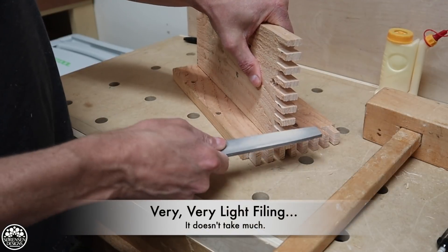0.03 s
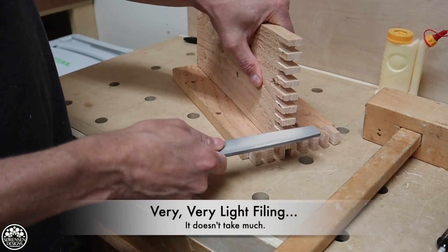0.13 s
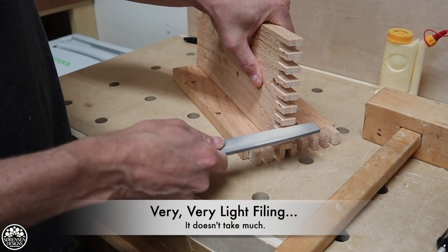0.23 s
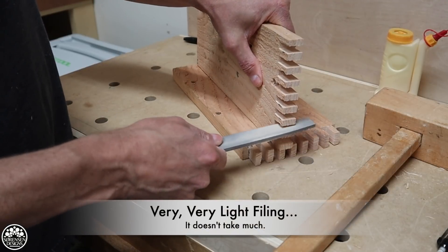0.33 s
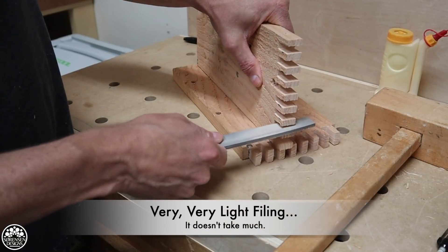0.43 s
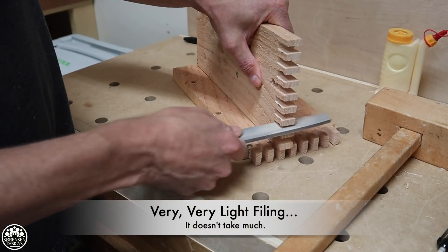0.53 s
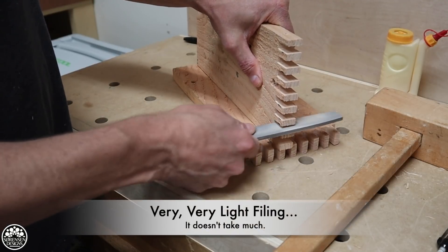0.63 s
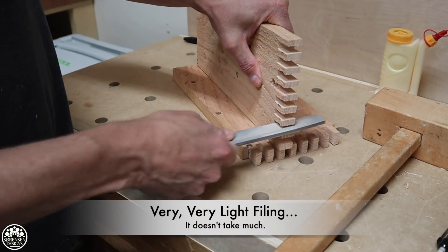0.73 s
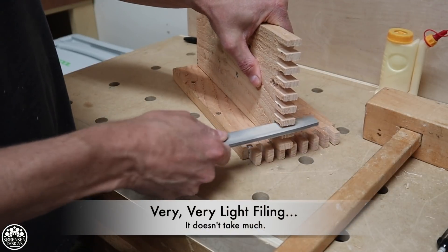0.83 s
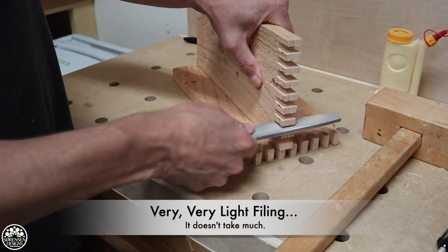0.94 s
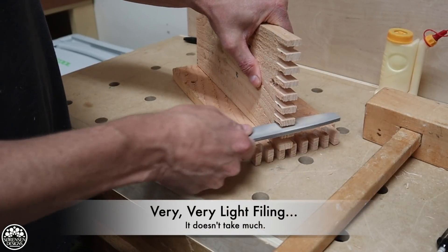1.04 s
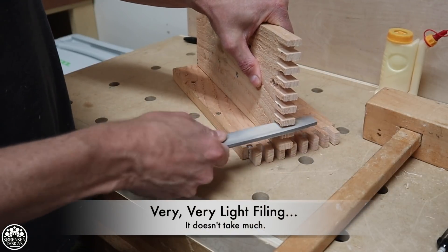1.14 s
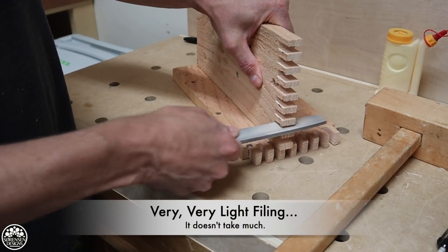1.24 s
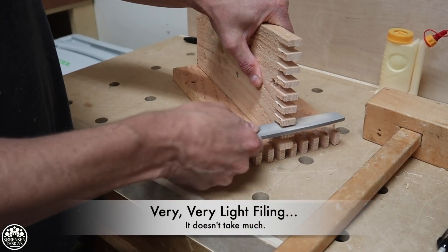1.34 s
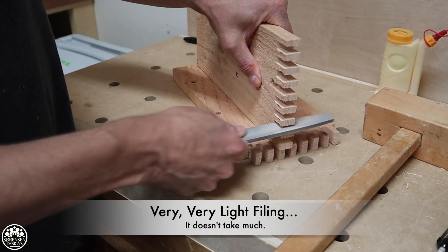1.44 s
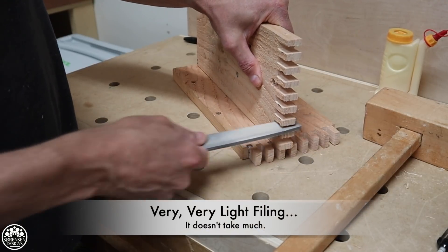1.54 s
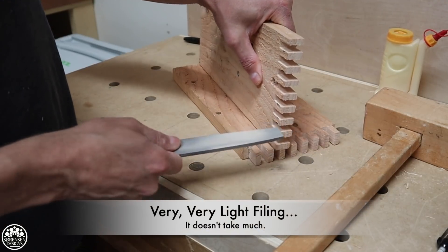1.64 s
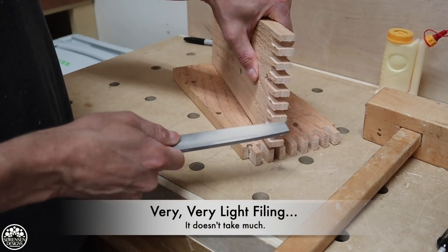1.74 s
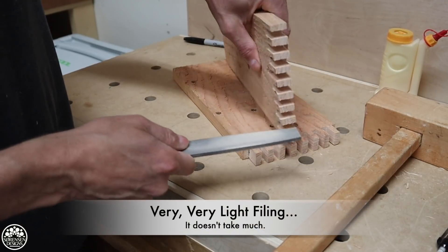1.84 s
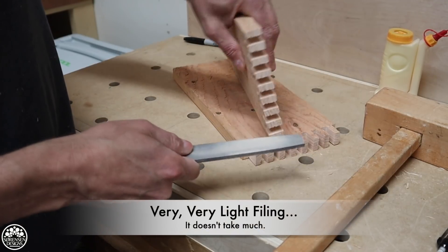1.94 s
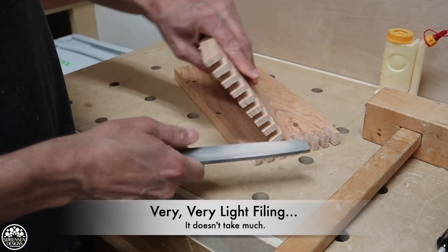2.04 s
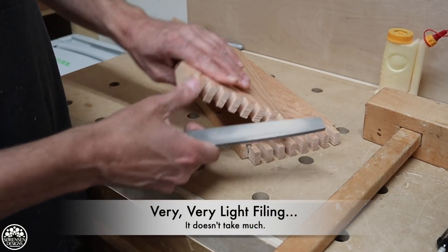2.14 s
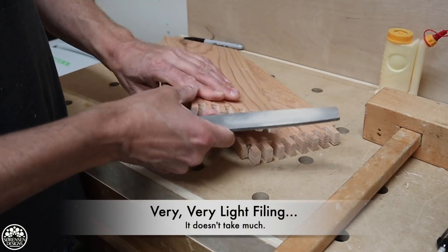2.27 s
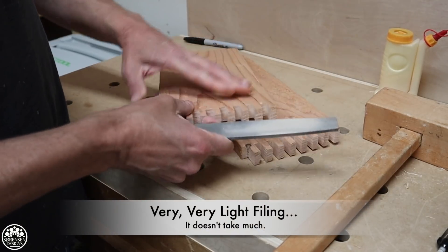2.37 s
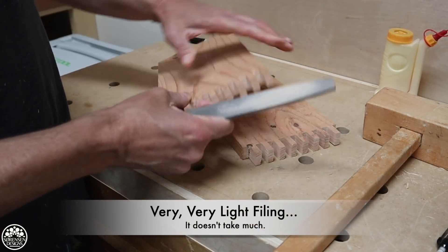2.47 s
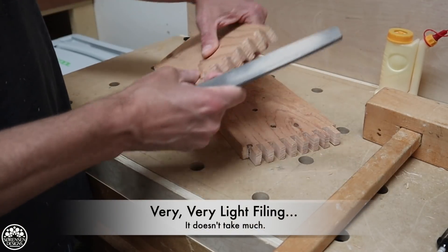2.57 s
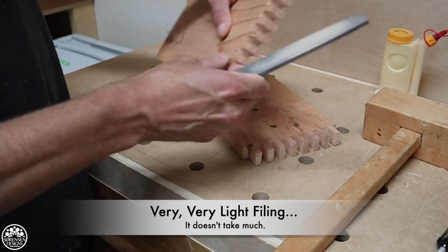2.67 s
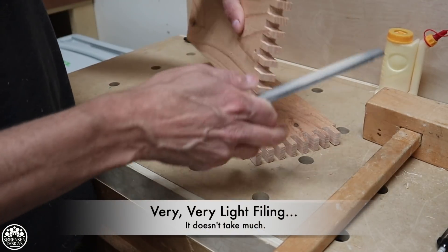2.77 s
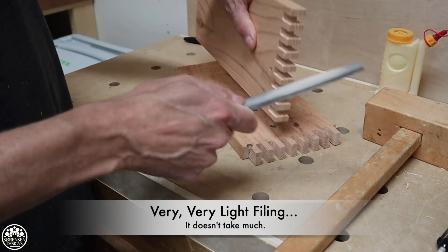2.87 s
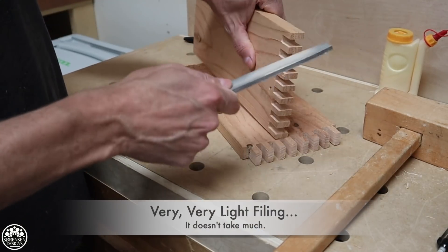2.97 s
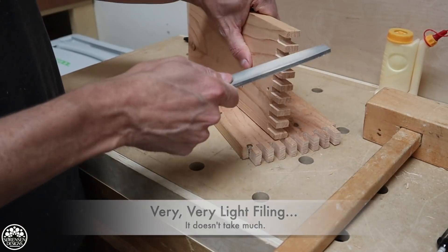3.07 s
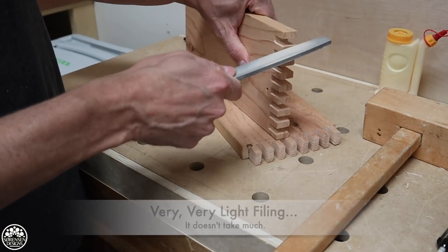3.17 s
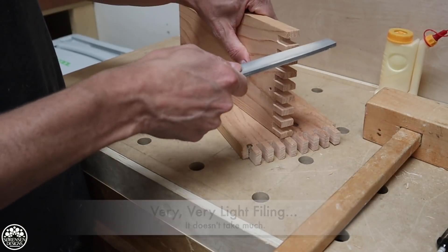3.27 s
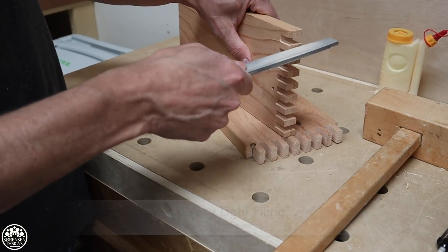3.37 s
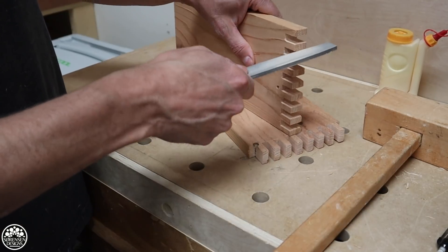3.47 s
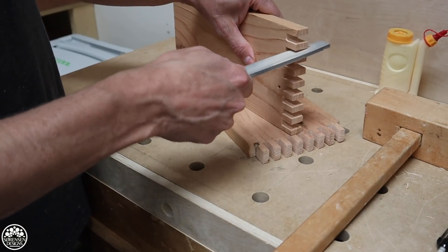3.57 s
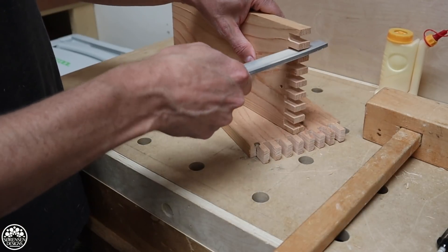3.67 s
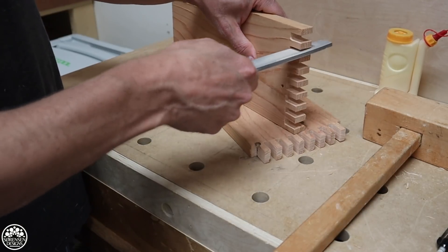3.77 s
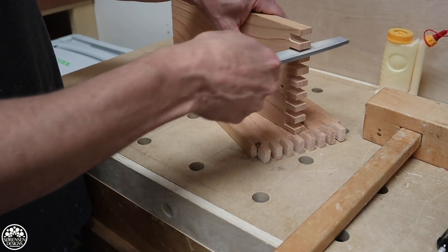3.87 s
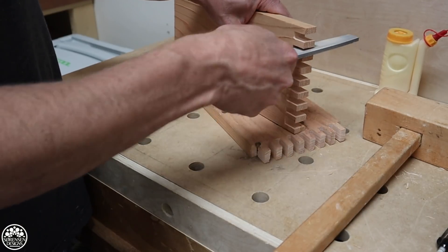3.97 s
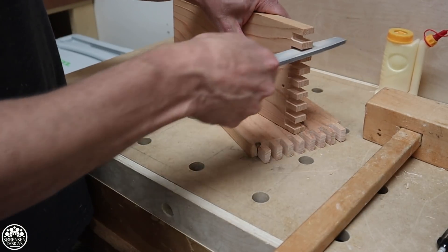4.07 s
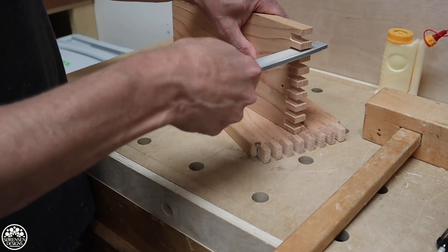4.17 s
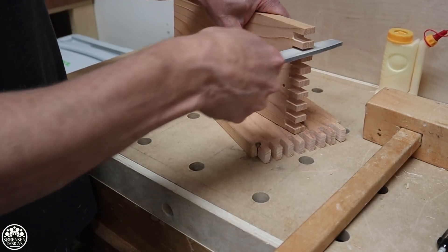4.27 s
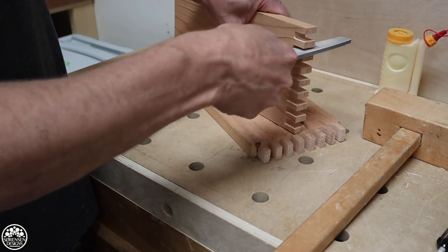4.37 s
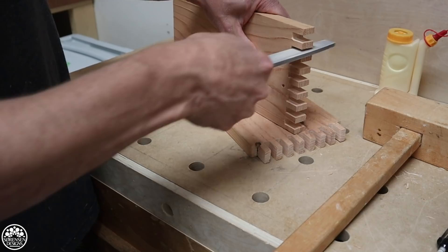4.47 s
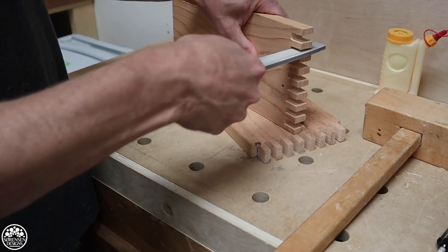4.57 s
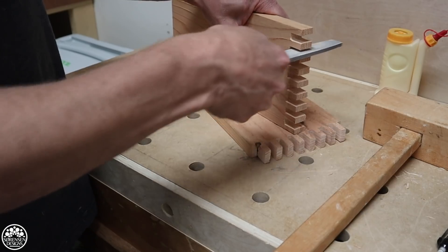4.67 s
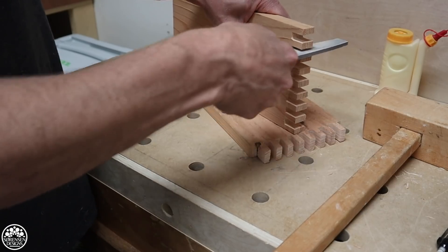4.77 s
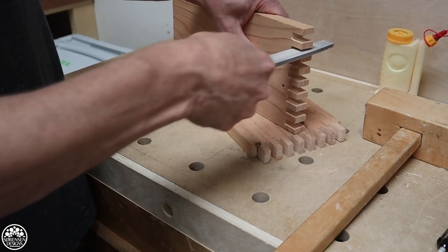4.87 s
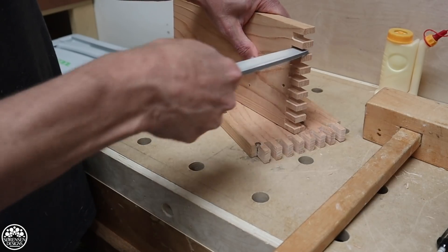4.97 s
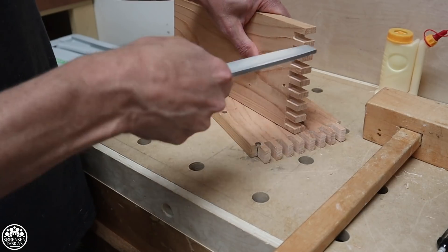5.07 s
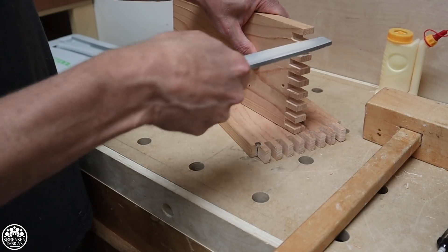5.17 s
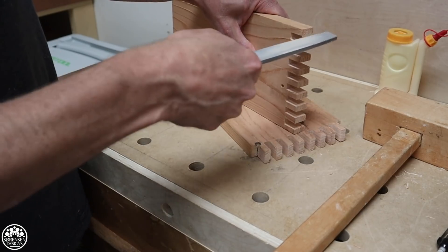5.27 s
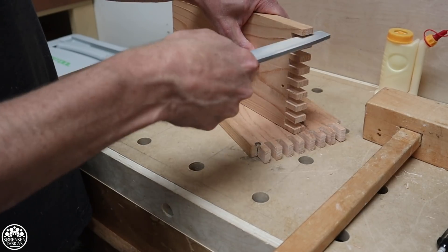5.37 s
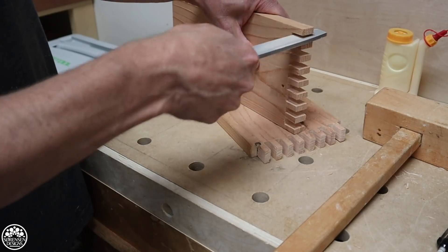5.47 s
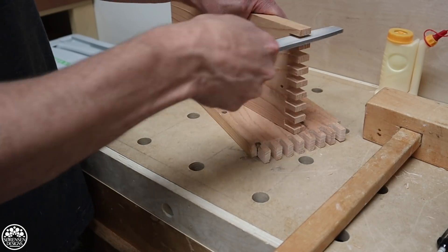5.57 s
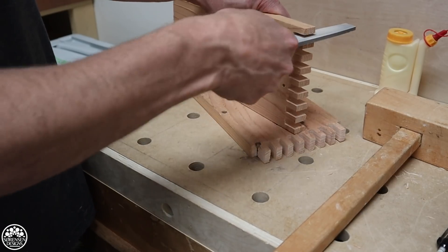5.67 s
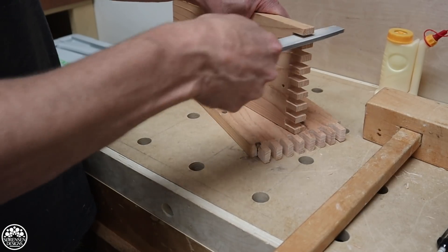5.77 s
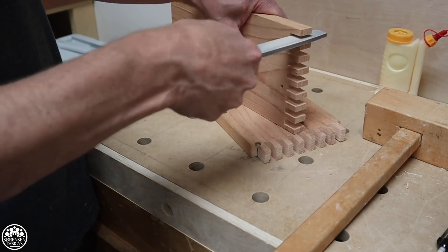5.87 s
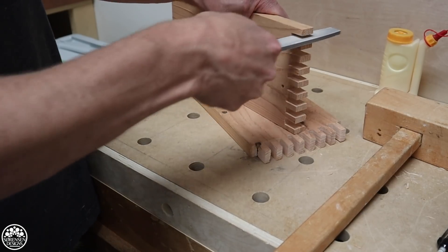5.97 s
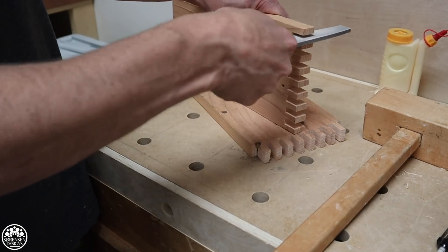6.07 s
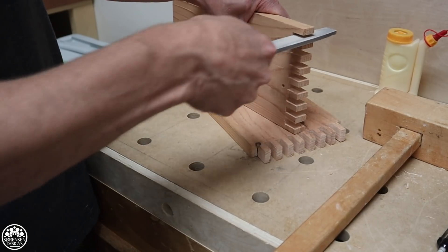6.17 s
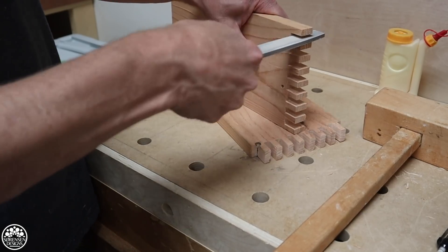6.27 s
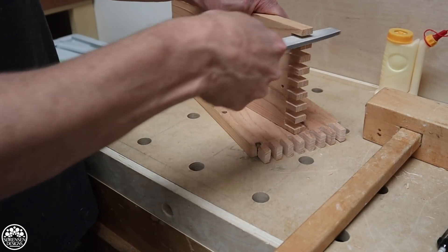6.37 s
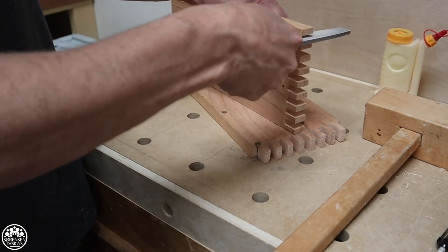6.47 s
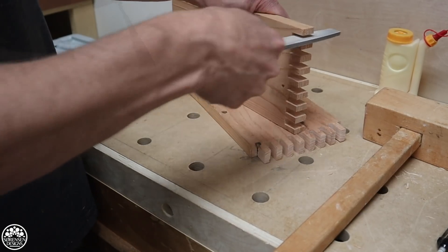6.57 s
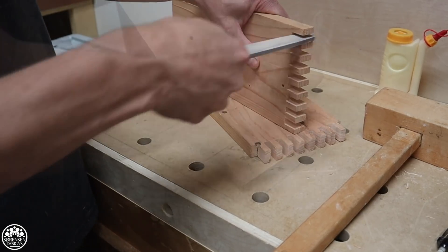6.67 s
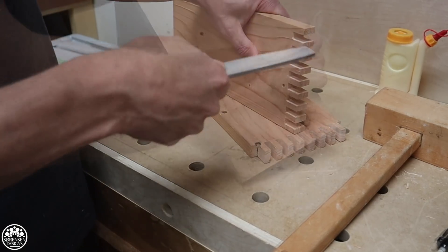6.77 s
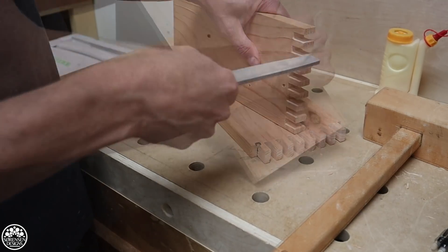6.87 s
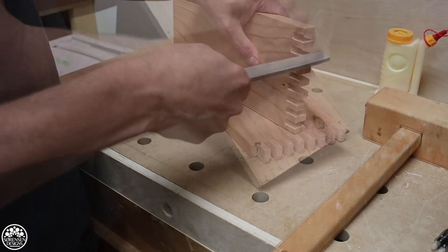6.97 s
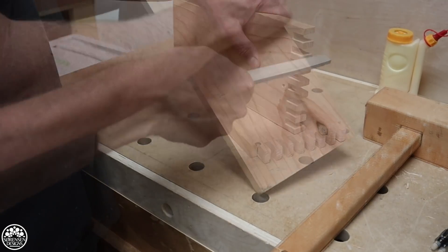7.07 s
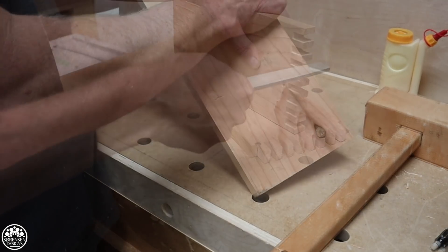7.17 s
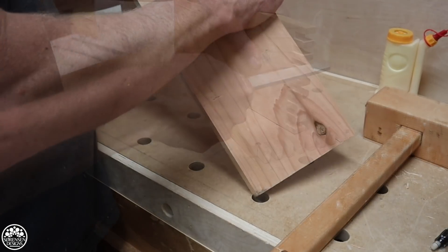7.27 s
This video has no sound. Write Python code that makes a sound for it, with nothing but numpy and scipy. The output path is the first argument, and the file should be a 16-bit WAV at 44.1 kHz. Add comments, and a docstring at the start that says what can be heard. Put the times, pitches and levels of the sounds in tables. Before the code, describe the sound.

A few soft knocks and scuffs of wood on a workbench open the sound. From about 0.5 to 1.7 seconds a flat metal file rasps over a board's joint fingers in six quick, light back-and-forth strokes. Between 1.7 and 3.7 seconds the board is handled: it slides and scuffs, clacks down with a short chatter near 2.5 seconds, then thuds at about 2.7 and 3.1 seconds as it is stood up again. The blade taps the wood with a brief ring at 3.7 seconds. A second run of six slightly softer strokes lasts from 3.9 to 5.1 seconds. After small bumps around 5.4 seconds, a third run goes from 5.6 to 6.8 seconds, with another clear tap near 6.5. Soft knocks and a slide follow around 7 seconds. The sound is mono, with short small-workshop reflections and a faint mains hum.

```python
"""Three runs of light rasping strokes: a flat metal file works back and forth over a board's joint fingers.
Its teeth pluck wood fibres and ring board and blade, differently at each finger. Between runs come
scuffs, knocks and a short chatter as the board is slid, laid down and stood up again on the bench.
The blade now and then taps or grazes the wood. Small workshop, faint mains hum, mono."""
import sys
import numpy as np
from scipy import signal
from scipy.fft import rfft, irfft
from scipy.io import wavfile
from scipy.ndimage import uniform_filter1d

SR = 44100
rng = np.random.default_rng(int(sys.argv[2]) if len(sys.argv) > 2 else 0)


def store_wav(level_fs):
    """Save 16-bit WAV to argv[1]."""
    pcm = np.round(np.clip(np.atleast_2d(level_fs), -1, 1) * 32767)
    wavfile.write(sys.argv[1], SR, pcm.T.astype(np.int16))


N = 322371
TIME = np.arange(N) / SR
USUAL_DB = -29.5  # ordinary stroke or blow


def undb(db):
    """dB to gain."""
    return 10 ** (np.asarray(db) / 20)


def unit(x, head=None):
    """Scale to rms 1, overall or over the first `head` samples."""
    return x / np.sqrt(np.mean(x[:head] ** 2) + 1e-20)


def band(x, lo_hz, hi_hz):
    """Band-pass."""
    sos = signal.butter(3, [lo_hz, min(hi_hz, .45 * SR)], "band", fs=SR, output="sos")
    return signal.sosfilt(sos, x)


def colour(x, slope, modes=(), size=8192):
    """Minimum-phase filter: slope (f/Hz, level/dB) plus resonances (f/Hz, width/Hz, lift/dB)."""
    f = np.maximum(np.fft.rfftfreq(size, 1 / SR), 1)
    slope_hz, slope_db = np.transpose(slope)
    broad = undb(np.interp(np.log(f), np.log(slope_hz), slope_db))
    lift = 1 + sum((undb(db) ** 2 - 1) / (1 + (2 * (f - hz) / width) ** 2) ** 1.63
                   for hz, width, db in modes)
    cepstrum = irfft(np.log(broad) + np.log(np.maximum(lift, .1)) / 2)[:size // 2]
    cepstrum[1:] *= 2
    return signal.fftconvolve(x, irfft(np.exp(rfft(cepstrum, size))))[:len(x)]


def walk(rate_hz):
    """Smooth random drift, rms 1."""
    knots = np.arange(0, N, SR / rate_hz)
    return unit(np.interp(np.arange(N), knots, rng.standard_normal(len(knots))))


def snaps(rate_hz, spread_db):
    """Fibres snap or catch: random impulses of random size, rms 1."""
    chance = np.clip(rate_hz / SR, 1e-4, 1)
    impulses = (rng.random(N) < chance) * rng.choice([-1, 1], N)
    return unit(impulses * undb(spread_db * rng.standard_normal(N)) / np.sqrt(chance))


def glide(start_s, end_s, squareness):
    """Envelope of one slide: swell, hold, fade."""
    off_centre = np.abs(2 * (TIME - start_s) / (end_s - start_s) - 1)
    return np.exp(-np.minimum(off_centre, 3) ** squareness)


def moving_contact(x, depth_db):
    """As the contact travels, modes swell and fade one by one, the high ones most."""
    f, _, frames = signal.stft(x, SR, nperseg=512)
    swell = uniform_filter1d(rng.standard_normal(frames.shape), size=4, axis=0)
    swell = unit(uniform_filter1d(swell, size=24, axis=1))
    gain = undb(depth_db * swell * np.interp(f, [0, 8000], [.65, 1])[:, None])
    gain /= np.sqrt(np.mean(gain ** 2, axis=1, keepdims=True))
    return signal.istft(frames * gain, SR, nperseg=512)[1][:len(x)]


def add(out, at_s, sound):
    """Mix a sound in."""
    start = int(at_s * SR)
    out[start:start + len(sound)] += sound[:N - start]


def background(air_db=-64):
    """Still room air and mains hum."""
    # air spectrum: f/Hz, level/dB
    air_slope = [(20,-36),(45,-28),(60,0.5),(80,4),(130,-29),(280,-14),(500,-10.5),(1000,-15.5),(2500,-17.5),(6000,-24),(15500,-30)]
    # mains partials: f/Hz, level/dB
    partials = [(59.5,-73),(119,-65.5)]
    air = unit(colour(rng.standard_normal(N), air_slope))
    hum = sum(undb(db) * np.sqrt(2) * np.sin(2 * np.pi * hz * TIME) for hz, db in partials)
    return undb(air_db) * air + hum


def ring(modes, detune, contact_hz=8000, mode_ratio=1):
    """Struck modes, detuned by the point of contact; a soft contact mutes the high ones."""
    t = TIME[:SR // 2]
    out = 0
    for k, (hz, db, t60_s) in enumerate(modes):
        phase = 2 * np.pi * hz * (1 + detune * rng.standard_normal()) * t
        out += mode_ratio ** k * undb(db - 60 * t / t60_s) * np.sin(phase) / (1 + (hz / contact_hz) ** 2)
    # little radiates outside the range of the modes
    return unit(band(out, 0.88 * modes[0][0], 2 * modes[-1][0]), head=1024)


def tick(decay_s):
    """Brief crack of two hard surfaces meeting."""
    # crack spectrum: f/Hz, level/dB
    slope = [(500,5.5),(1500,-12),(2700,4.5),(4500,2.5),(7000,-9),(11000,-23),(16000,-18)]
    t = TIME[:SR // 2]
    burst = rng.standard_normal(len(t)) * np.exp(-t / decay_s)
    return unit(colour(burst, slope), head=1024)


def knocks(thud_hz=320, clack_hz=1200, crack_hz=3600, crispness=1.3):
    """Board hits bench: frame booms, top thuds, board clacks; a soft contact mutes clack and crack."""
    # blows: t/s, level/dB, contact hardness/Hz, weight on bench/dB
    blows = [(.131,-35,910,-10),(.364,-37.5,450,-6.5),(.447,-47.5,600,-5),(2.112,-40,200,1.5),(2.459,-28,2590,-9),(2.7076,-21,200,-21),(3.077,-21,476,-10),(3.531,-45,600,-6),(5.407,-38.5,400,-4.5),(5.479,-43,600,2.5),(6.897,-47,395,-13),(7.038,-38.5,650,-19),(7.179,-47,390,-2)]
    # bench frame, bench top, board, board face slapped flat: f/Hz, level/dB, t60/s
    frame_modes = [(105.6,0,0.43),(147,6,0.088),(178.7,3,0.15),(221,-28,.06)]
    bench_modes = [(257,-2,0.11),(297.5,13,0.057),(367,8.5,0.077),(388,6,0.047),(442,3.5,0.13),(557,-28.5,0.055)]
    board_modes = [(611,-0.5,0.032),(678,-2,0.061),(884,-3,0.04),(1054,-3,0.042),(1286,-6.5,0.049),(1504,-1.5,.035),(1573,-2,0.019),(1866,3,0.01),(1886,-5,0.017),(2280,-2,0.031)]
    clap_modes = [(1350,0.2,0.022),(1580,-1.2,0.013)]
    out = np.zeros(N)
    for at_s, level_db, contact_hz, weight_db in blows + rebounds():
        clack_gain, crack_gain = ((contact_hz ** 2 + thud_hz ** 2) / (contact_hz ** 2 + hz ** 2)
                                  for hz in (clack_hz, crack_hz))
        # only a hard, flat landing claps
        crack = undb(3) * tick(0.0021) + undb(22) * crack_gain * ring(clap_modes, 0.02)
        # wood stiffens under load: the crack grows faster than the blow
        crack *= undb(crispness * (level_db - USUAL_DB)) * crack_gain
        boom = undb(weight_db - 1) * ring(frame_modes, 0.0047, contact_hz)
        thud = ring(bench_modes, 0.035, contact_hz)
        clack = undb(5.5) * clack_gain * ring(board_modes, 0.055, contact_hz, mode_ratio=-1.03)
        add(out, at_s, undb(level_db) * (boom + thud + clack + crack))
    return out


def sliding(scuff_db=-0.5, judder_db=-1, patchy_db=2, catch_db=-9):
    """Wood and steel scuff and catch on the grain; more weight makes the board judder more."""
    # slides: start/s, end/s, level/dB, weight on bench/dB
    slides = [(0.135,0.28,-57.5,8),(0.355,0.423,-55,6),(0.44,0.477,-48.5,6),(1.743,1.886,-44.5,-3),(1.95,2,-52,5),(2.025,2.143,-44.5,3.5),(2.157,2.28,-56.5,-3),(2.32,2.47,-46,-7.5),(2.63,2.817,-46,-5),(3.255,3.401,-51.5,-3),(3.42,3.482,-50,6),(3.502,3.62,-44.5,1.5),(3.642,3.75,-55,7.5),(5.343,5.372,-44.5,7.5),(5.49,5.548,-53.5,18),(7.017,7.275,-49.5,3)]
    # friction spectra: f/Hz, level/dB
    scuff_slope = [(300,-14),(600,-6.5),(1000,2),(1800,-6.5),(3000,1),(5000,-1),(7000,-8.5),(11000,-13.5),(16000,-22)]
    judder_slope = [(50,-19.5),(82,-11.5),(106,6),(132,-9),(200,-4),(300,4.5),(400,-7),(600,-10.5),(1200,-30),(4000,-49)]
    # scuffed resonances: f/Hz, width/Hz, lift/dB
    scuff_modes = [(863,48,14),(966,140,6),(1318,29,13),(2290,250,12.5),(3530,210,5),(5350,430,2)]
    friction = rng.standard_normal(N) + undb(catch_db) * snaps(rate_hz=160, spread_db=3.5)
    friction *= undb(patchy_db * (walk(110) + walk(30)))
    scuff = moving_contact(colour(friction, scuff_slope, scuff_modes), depth_db=3.5)
    scuff *= undb(scuff_db) / np.std(band(scuff, 2000, 12000))
    judder = undb(judder_db) * unit(colour(snaps(rate_hz=600, spread_db=7.1), judder_slope))
    return sum(undb(level_db) * glide(start_s, end_s, squareness=4.3) * (scuff + undb(weight_db) * judder)
               for start_s, end_s, level_db, weight_db in slides)


def stroke_envelopes(strokes, give, turn_db=-25):
    """Rasp and shudder gains: the hand speeds up, holds, slows. A firmly held board has low `give`."""
    rasp_power, shudder_power = 0, 0
    for start_s, end_s, effort_db, rise_db in strokes:
        along = np.clip((TIME - start_s) / (end_s - start_s) - .5, -3, 3)
        off_centre = np.abs(2 * along)
        touch = undb(turn_db) * np.exp(-(off_centre / 1.7) ** 4)  # blade still touches at the turn
        lean = undb(rise_db * np.clip(along, -.5, .5))
        rasp_power += (undb(effort_db) * lean * (np.exp(-off_centre ** 3.6) + touch)) ** 2
        grip = np.exp(-.5 * off_centre ** 7) + 0.57 * touch  # teeth grip at once: squarer envelope
        shudder_db = USUAL_DB + give * (effort_db - USUAL_DB)
        shudder_power += (undb(shudder_db) * lean ** 0.97 * grip) ** 2
    return np.sqrt(rasp_power), np.sqrt(shudder_power)


def filing(strokes, slope, modes, rasp_db, body_db, give, tooth_hz, split_hz=1800, usual_speed=0.51):
    """Tooth rows pluck the fibres; a faster stroke is louder, denser and brighter."""
    rasp, shudder = stroke_envelopes(strokes, give)
    speed = np.clip(rasp / rasp.max(), 1e-3, 1) ** .5
    rows = np.cumsum(tooth_hz * speed * (1 + .08 * walk(60))) / SR  # the hand wavers
    teeth = np.diff(np.floor(rows), prepend=0) * undb(2.8 * rng.standard_normal(N)) / np.sqrt(speed)
    force = snaps(12000 * speed, spread_db=3) + undb(-9) * unit(band(teeth, 296, 13300))
    force *= undb(0.81 * walk(170))  # uneven grip
    sound = moving_contact(colour(force, slope, modes), depth_db=3)
    # wood carries the lows, the cutting edge the highs
    body = signal.sosfiltfilt(signal.butter(4, split_hz, fs=SR, output="sos"), sound)
    edge = sound - body
    fizz = signal.sosfiltfilt(signal.butter(1, 6000, "high", fs=SR, output="sos"), edge)
    edge = (edge + fizz * ((speed / usual_speed) ** 0.44 - 1)) / np.std(edge)
    chatter_db = 1.4 * walk(55)  # blade catches and lets go
    return undb(rasp_db) * rasp * edge + undb(body_db + chatter_db) * shudder * unit(body)


def taps(tick_db=-17):
    """The blade bumps a finger and rings briefly."""
    # bumps: t/s, level/dB
    bumps = [(.973,-28),(3.527,-41.5),(3.708,-20),(4.015,-36),(4.715,-27.5),(5.345,-35),(5.583,-29),(6.507,-22.5)]
    # ring of a file tap: f/Hz, level/dB, t60/s
    modes = [(755,4,0.024),(870,10,0.07),(950,-7.5,0.39),(920,-10,0.021),(1140,6.5,0.026),(1310,-3.5,0.098),(1450,-48,0.039),(2130,-1.5,0.018),(2570,-2.5,0.026),(3460,-4,0.028)]
    out = np.zeros(N)
    for at_s, level_db in bumps:
        add(out, at_s, undb(level_db) * (ring(modes, detune=0.0018) + undb(tick_db) * tick(0.0042)))
    return out


def singing(q=20):
    """Lightly grazed, blade or board sings at the one resonance the contact point favours."""
    # grazes: start/s, end/s, level/dB, f/Hz
    grazes = [(1.85,1.88,-41,2284),(2.667,2.702,-40.5,1014),(2.76,2.81,-46,4900),(3.636,3.73,-62,7640),(3.854,3.973,-58,7700),(5.055,5.147,-58,7900)]
    out = np.zeros(N)
    for start_s, end_s, level_db, hz in grazes:
        peak = signal.iirpeak(hz, q, SR)
        tone = signal.lfilter(*peak, signal.lfilter(*peak, rng.standard_normal(N)))
        out += undb(level_db) * glide(start_s, end_s, squareness=3) * unit(tone)
    return out


def rebounds(start_s=2.508, first_gap_s=0.01105, gap_ratio=0.85, first_db=-35, loss_db=1.6):
    """Blows of the flat board chattering to rest, each sooner and weaker than the last."""
    contact_hz, weight_db = 1200, -9.5
    times_s = start_s + first_gap_s * (1 - gap_ratio ** np.arange(8)) / (1 - gap_ratio)
    return [(at_s, first_db - loss_db * k, contact_hz, weight_db) for k, at_s in enumerate(times_s)]


def workshop(x, wet_db, treble_db, build_s=0.0026):
    """Add reflections from near walls and shelves; the top octave dies first."""
    # room decay: f/Hz, t60/s
    decay = [(100,0.47),(300,0.34),(1000,0.55),(2500,0.46),(6000,0.57),(14000,0.13)]
    hz, t60_s = np.transpose(decay)
    t = TIME[:int(.7 * SR)]
    tail = 0
    for centre_hz in 90 * 2. ** np.arange(8):
        band_t60_s = np.interp(np.log(centre_hz), np.log(hz), t60_s)
        noise = band(rng.standard_normal(len(t)), centre_hz / np.sqrt(2), centre_hz * np.sqrt(2))
        tail += noise * undb(treble_db * min(centre_hz / 5000, 1) - 60 * t / band_t60_s)
    tail *= (1 - np.exp(-(t / build_s) ** 2)) / np.sqrt(0.024 * SR)
    return x + undb(wet_db) * signal.fftconvolve(x, tail)[:N]


def scene():
    """Filing at the low, upper and top finger, with handling between the runs."""
    # file strokes: start/s, end/s, effort/dB, rise over stroke/dB
    low_strokes = [(.548,.715,-25.5,2),(.778,.902,-27,-3.5),(.948,1.077,-26,-2),(1.126,1.252,-29.5,6),(1.31,1.439,-27,-3),(1.497,1.672,-29.6,1)]
    upper_strokes = [(3.862,4.036,-34.5,12.5),(4.12,4.254,-30,5.5),(4.314,4.436,-28.5,3),(4.507,4.636,-30,0),(4.698,4.824,-29.5,5),(4.92,5.09,-31.5,-7)]
    top_strokes = [(5.572,5.755,-33,6),(5.835,5.955,-30,0),(6.018,6.143,-30,5),(6.218,6.336,-30,7.5),(6.423,6.536,-29.5,1),(6.632,6.797,-33.5,-7)]
    # rasp spectra: f/Hz, level/dB
    low_slope = [(70,-35),(120,-30),(185,-3),(300,-3),(420,-4),(650,-2.5),(1100,-9),(1900,-17.5),(3200,-16.5),(5500,-23.5),(8000,-28.5),(11000,-29.5),(14000,-34),(16000,-52)]
    upper_slope = [(70,-32),(130,-15.5),(200,-7.5),(270,-1),(450,-5),(700,-5),(1100,-12.5),(1900,-21.5),(3200,-21),(5500,-22),(8000,-30.5),(11000,-37.5),(14000,-35.5),(16000,-51)]
    top_slope = [(70,-33),(140,-17.5),(200,-12),(270,-0.5),(450,-4),(700,-5.5),(1300,-8.5),(1900,-22.5),(3200,-23),(5500,-28.5),(8000,-34),(11000,-40.5),(14000,-40.5),(16000,-55)]
    # board and blade resonances: f/Hz, width/Hz, lift/dB
    low_modes = [(188,10,4),(267,19,-1),(396,66,7),(462,51,10),(890,24,-2),(918,69,14.5),(1289,31,15.5),(1661,150,14.5),(2262,122,21.5),(2480,85,13.5),(2874,104,15),(3750,300,8.5),(4200,220,12),(4760,81,10),(5320,140,11.5),(6330,79,13),(6500,59,9),(6780,79,13),(8390,190,11),(8940,60,9)]
    upper_modes = [(262,26,4.1),(380,19,2.3),(445,63,10),(562,29,5.3),(860.4,22,17.5),(917,47,17.1),(1192,116,9.6),(1430,340,9.5),(2232,135,15.8),(2565,160,12.3),(2782,61,15),(3510,63,12.2),(4170,150,9.4),(5340,150,7.6),(6500,120,2),(7440,90,3.6),(8600,110,3),(9170,200,8.6)]
    top_modes = [(250,8.7,2.4),(375,22,2.3),(448,43,9.3),(580,25,1.9),(720,50,5.2),(858,23,8.5),(900,68,17.3),(1172,80,4.7),(1483,120,8.9),(2210,196,13.8),(2544,49,13),(2870,24,1.9),(3520,130,8.2),(4270,630,7),(5360,74,12),(6330,150,5.2),(6900,160,5.8),(9340,200,5),(11300,250,7.3)]
    runs = filing(low_strokes, low_slope, low_modes, rasp_db=-1, body_db=-0.7, give=1.64, tooth_hz=898)
    runs += filing(upper_strokes, upper_slope, upper_modes,
                   rasp_db=-0.5, body_db=5.5, give=1, tooth_hz=1005.5)
    runs += filing(top_strokes, top_slope, top_modes, rasp_db=-1, body_db=6, give=0.88, tooth_hz=1009)
    rubbing = workshop(runs + sliding() + singing(), wet_db=-8, treble_db=-7)
    blows = workshop(knocks() + taps(), wet_db=-5.5, treble_db=-11.5)
    return (rubbing + blows + background())[None]


def record(dry, ceiling=0.37, cutoff_hz=15800):
    """Soft peak limiter, then a steep low-pass."""
    limited = dry / (1 + (dry / ceiling) ** 8) ** (1 / 8)
    return signal.sosfilt(signal.ellip(10, .2, 70, cutoff_hz, fs=SR, output="sos"), limited)


dry = scene()
out = record(dry)
store_wav(out)
```